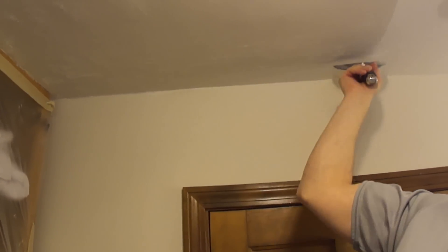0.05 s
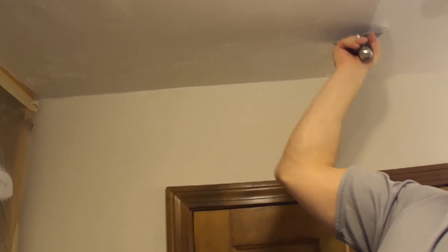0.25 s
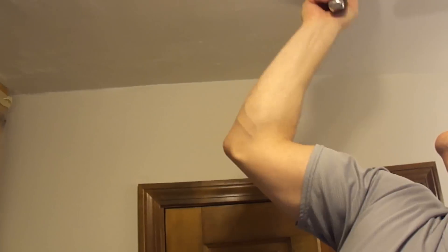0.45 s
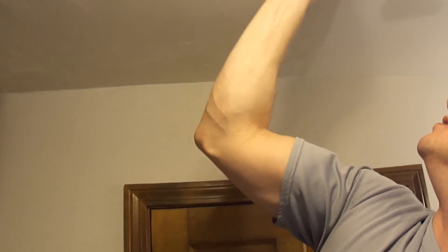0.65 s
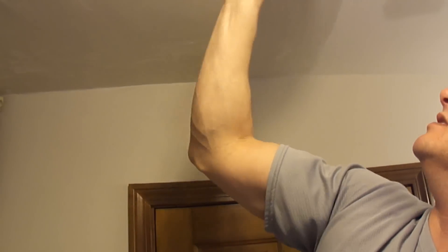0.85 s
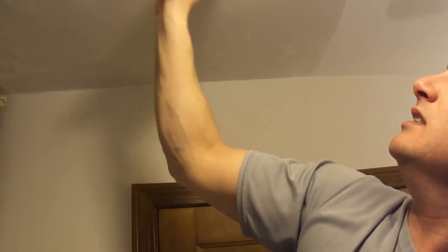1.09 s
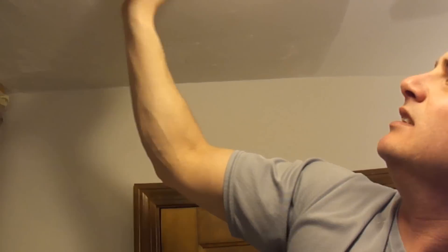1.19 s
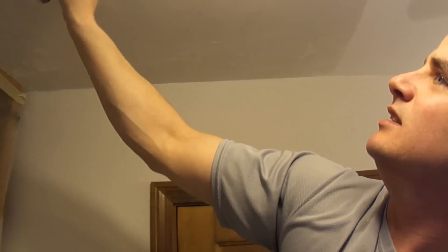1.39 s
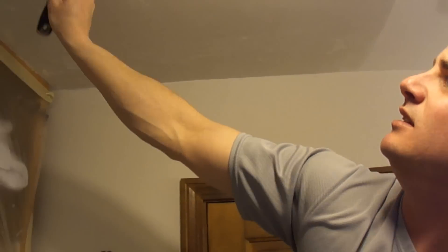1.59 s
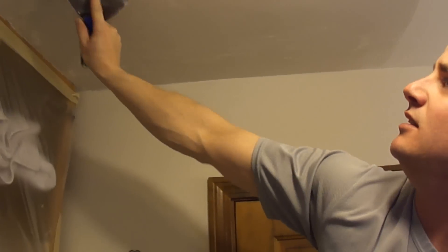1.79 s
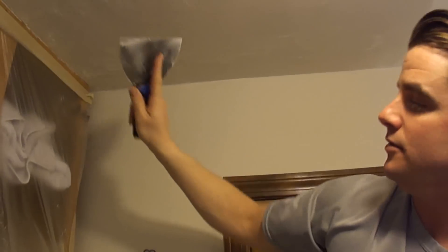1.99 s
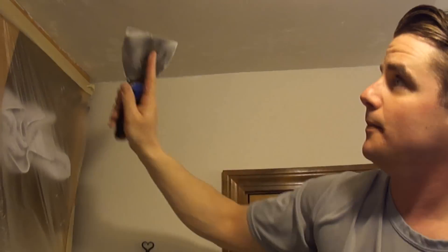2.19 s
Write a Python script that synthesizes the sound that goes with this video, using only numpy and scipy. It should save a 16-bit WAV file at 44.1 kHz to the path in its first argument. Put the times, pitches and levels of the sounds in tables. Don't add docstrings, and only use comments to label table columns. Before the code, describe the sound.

One long harsh scrape of a metal putty blade over dry ceiling plaster in a small room

```python
import sys
import numpy as np
from scipy import signal
from scipy.fft import rfft, irfft, next_fast_len
from scipy.io import wavfile

SR = 44100
rng = np.random.default_rng(int(sys.argv[2]) if len(sys.argv) > 2 else 0)


def wrap_up_sound(samples):
    columns = np.atleast_2d(samples).T
    tamed = np.clip(columns, -1, 1)
    steps = np.round(tamed * 32767).astype(np.int16)
    wavfile.write(sys.argv[1], SR, steps)


def voltage_ratio(decibels):
    exponent = np.asarray(decibels, float) / 20
    return 10 ** exponent


N = 99225

# time in [s], scrape level in [dB], brightness from edge speed in [dB per octave],
# blade flex pitch in [Hz].
STROKE_PATH = [(0.23, -18, -3, 990), (.272, -21, -1, 990), (0.321, -15.5, -0.5, 1360),
               (.358, -18.5, 2, 2070), (.544, -18.5, -1, 2250), (.668, -19, 0.5, 1780),
               (.696, -20, -1, 2390), (.724, -23.5, -0.5, 1850), (.9, -21, 0.5, 1480),
               (1.014, -22, 1.5, 1495), (1.328, -21, 2.5, 2700), (1.41, -19.5, 2, 2030),
               (1.55, -19.5, 1.5, 2700), (1.652, -22, 1, 2420), (1.741, -19.5, 1.5, 2730),
               (1.802, -25.5, -2, 1230), (1.867, -24.5, 1, 1360), (2.0, -53.5, -1, 900)]
# start in [s], level in [dB], length in [s].
LANDING_CHATTER = [
    (.128, -54, .034),
    (.2072, -31, .014),
    (.2218, -18, .008),
]
# time in [s], level in [dB], board share in [dB].
LANDING_KNOCKS = [
    (0.2083, -31.5, 2),
    (.2138, -31, 0),
    (.2219, -17.5, -6),
    (.2226, -16.5, -28),
    (.2236, -19, -9),
    (.2242, -20, -15),
    (.2257, -18, -9),
    (.2268, -19, -14),
    (.2293, -23, -10),
]
# time in [s], level in [dB], rise in [s], fall in [s],
# low thump in [dB].
HIGH_SPOTS = [(.235, -24.5, 0.0041, 0.046, 4), (.31, -46, 0.034, 0.011, -8), (.42, -56, 0.047, 0.056, 9),
              (0.589, -37.5, 0.0091, 0.04, 2), (0.949, -34, 0.022, 0.027, -3),
              (1.11, -42, 0.036, 0.012, -4), (1.29, -45, 0.017, 0.082, -16), (1.41, -45, 0.015, 0.016, -11),
              (1.66, -51, 0.0067, 0.023, -10), (1.774, -31.5, 0.017, 0.063, -15),
              (1.83, -48, 0.039, 0.12, 7.5), (1.923, -33.5, 0.026, 0.018, -8)]
# time in [s], peak in [dB].
GRIT_SNAPS = [(0.2985, -6), (0.3112, -20), (0.3646, -7), (0.446, -4), (0.5115, -2.5), (0.5246, -6),
              (0.6, -9), (0.645, -12), (0.682, -11), (0.7426, -4), (0.7761, -6), (0.7886, -12), (0.826, -3),
              (0.9415, -8), (0.9982, -16), (1.019, -14), (1.0374, -9), (1.0905, -17), (1.1596, -22),
              (1.2157, -12), (1.238, -11), (1.2957, -7), (1.3103, -6), (1.3376, -11), (1.4189, -10),
              (1.4491, -14), (1.4674, -6), (1.5067, -10), (1.5375, -15), (1.585, -21), (1.6253, -10),
              (1.6926, -7), (1.8447, -18), (1.8562, -15)]
# frequency in [Hz], level in [dB].
SCRAPE_COLOUR = [(320, -38.5), (600, -15.5), (1010, -0.5), (1740, -1.5), (2500, -2.5), (4500, -12),
                 (6500, -17), (10900, -35.5)]
# frequency in [Hz], width in [Hz], level over the scrape in [dB].
BLADE_MODES = [(717, 45, 5), (960, 60, 3), (1227, 60, 3.5), (1410, 60, 3), (1494, 60, 3.5), (1782, 60, 3.5),
               (2100, 90, 3.5), (2400, 80, 3), (2600, 80, 4), (2826, 60, 4.5), (3080, 120, 4),
               (3480, 180, 4.5), (4300, 300, 4), (7050, 201, 2)]
# frequency in [Hz], width in [Hz], level in [dB].
BOARD_MODES = [(71, 140, -42), (158.4, 19.5, -13.5), (237, 62, -12), (409, 92, -9.5), (498.3, 32.3, 3.5),
               (690, 426, -8.5)]
# centre in [s], rms level in [dB], pitch in [Hz],
# half length in [s].
EDGE_CATCHES = [(0.313, -44, 6406, 0.018), (0.313, -36, 4349, 0.018), (0.313, -25, 1313, 0.018),
                (0.316, -26, 947, 0.018), (0.319, -27, 2056, 0.018), (0.325, -29, 2347, 0.018),
                (0.351, -32, 3563, 0.018), (0.389, -36, 4349, 0.018), (0.459, -31, 3337, 0.018),
                (0.522, -27, 2185, 0.018), (0.531, -28, 2573, 0.018), (0.58, -27, 1227, 0.018),
                (0.688, -30, 1776, 0.018), (0.697, -27, 2411, 0.018), (0.833, -31, 1787, 0.018),
                (0.856, -31, 1561, 0.018), (0.955, -44, 5964, 0.018), (0.955, -34, 484, 0.018),
                (1.004, -31, 1399, 0.018), (1.112, -39, 495, 0.018), (1.112, -31, 1475, 0.018),
                (1.173, -29, 1475, 0.018), (1.193, -34, 1055, 0.018), (1.268, -31, 1754, 0.018),
                (1.297, -32, 3509, 0.018), (1.318, -26, 2400, 0.018), (1.329, -28, 1496, 0.018),
                (1.39, -32, 1044, 0.018), (1.437, -41, 6180, 0.018), (1.541, -28, 2820, 0.018),
                (1.547, -28, 2357, 0.018), (1.611, -30, 1378, 0.018), (1.617, -33, 990, 0.018),
                (1.646, -30, 2411, 0.018), (1.681, -30, 1399, 0.018), (1.71, -30, 2691, 0.018),
                (1.724, -39, 4425, 0.018), (1.727, -43, 5458, 0.018), (1.73, -46, 6363, 0.018),
                (1.73, -44, 5652, 0.018), (1.733, -30, 2508, 0.018), (1.741, -33, 3219, 0.018),
                (1.765, -31, 1205, 0.018), (1.779, -35, 495, 0.018), (1.837, -31, 1388, 0.018),
                (1.927, -38, 506, 0.018)]
# centre in [s], rms level in [dB], pitch in [Hz],
# half length in [s].
NEXT_LANDING_RINGS = [
    (2.2483, -32, 1600, .002),
    (2.2493, -32, 2950, .002),
    (2.249, -35, 4450, .0025),
]
# start in [s], level in [dB], pitch in [Hz], ring T60 in [s].
CRUMB_TICKS = [(0.039, -48, 1410, 0.066), (.0505, -41, 5300, .004), (.0505, -46, 4000, .004),
               (.055, -45, 1390, .04), (.061, -43, 617, 0.038), (0.071, -42, 1430, .03),
               (0.084, -43, 444, 0.024), (.117, -42, 5500, .004), (.1275, -46, 6400, .005),
               (.132, -40, 2960, 0.022), (.133, -46, 895, .02), (0.146, -38.5, 402, .05),
               (.184, -37, 5400, .004), (.184, -44, 4200, .004), (2.002, -43, 3180, 0.011),
               (2.148, -37.5, 690, 0.056), (2.163, -34, 740, 0.019), (2.193, -43, 690, 0.028),
               (2.219, -33, 5130, .003)]
# frequency in [Hz], level in [dB].
FLOOR_COLOUR = [(25, -30), (100, -11), (250, -0.5), (500, 0), (1300, -1), (3000, -7.5), (6000, -13.5),
                (11000, -27)]

GRIT_PER_S, BITES_PER_S, GRIT_SPREAD_DB, HISS_SHARE = 6000, 2500, 0.5, 0.5
FLUTTER_DB, PATCHY_DB, TOUCH_TILT_DB = 0.45, 1.5, 1.5
BOARD_SHARE_DB, BITE_LOW_CUT_HZ = -28, 340
NEXT_S, NEXT_DB, NEXT_RISE_S = 2.2435, -30, 0.004
SNAP_DB, SNAP_BOARD_DB, KNOCK_SOFT_HZ = -19, -20, 4200
FLEX_DB, FLEX_OCTAVES = 6.5, 0.19
WANDER_DB, WANDERS_PER_S = 2.5, 9
CATCH_WOBBLE_RAD, CATCH_FLUTTER_DB, WOBBLES_PER_S = 1.1, 4, 70
ROOM_T60_S, WALL_CUT_HZ, ROOM_DB, FLOOR_DB = 0.21, 6900, -10, -51
HALF_RATE_HZ, CUTOFF_HZ = 11025, 15720
IMAGE_DB, IMAGE_RISE_HZ, LEAK_DB, OVERLOAD_TOP = -8, 11700, -40, 0.72


def knife():
    t = np.arange(N) / SR
    s, level_db, tilt_db, flex_hz = np.transpose(STROKE_PATH)
    touch = np.clip((t - s[0] + 0.0021) / 0.0034, 0, 1) * np.clip((s[-1] - t) / 0.03, 0, 1)
    edge = touch * voltage_ratio(np.interp(t, s, level_db) + FLUTTER_DB * drift(14))

    push = thump = edge * voltage_ratio(BOARD_SHARE_DB)
    for at_s, db, rise_s, fall_s, low_db in HIGH_SPOTS:
        shape = np.exp(-np.where(t < at_s, ((at_s - t) / rise_s) ** 2, (t - at_s) / fall_s))
        bite = touch * voltage_ratio(db) * shape
        push = push + bite
        thump = thump + voltage_ratio(low_db) * bite

    edge = edge + voltage_ratio(NEXT_DB) * np.clip((t - NEXT_S) / NEXT_RISE_S, 0, 1.5)
    for at_s, db, length_s in LANDING_CHATTER:
        age = (t - at_s) / length_s
        edge = edge + voltage_ratio(db) * (age > 0) * np.exp(-np.clip(age, 0, 3) ** 4)

    fine = rms_one(grit(GRIT_PER_S) + HISS_SHARE * rng.standard_normal(N))
    coarse = grit(BITES_PER_S)
    outside_stroke = (t < LANDING_CHATTER[-1][0]) | (t > s[-1])
    tilt_db = np.where(outside_stroke, TOUCH_TILT_DB, np.interp(t, s, tilt_db))
    on_blade = patchy(fine, tilt_db, PATCHY_DB) * edge
    high = signal.butter(4, BITE_LOW_CUT_HZ, "high", fs=SR, output="sos")
    low = signal.butter(4, BITE_LOW_CUT_HZ, "low", fs=SR, output="sos")
    on_board = signal.sosfilt(high, coarse * push) + signal.sosfilt(low, coarse * thump)

    blade_sound = blade(on_blade + knocks(board_share=0), np.interp(t, s, flex_hz))
    board_sound = board(on_board + knocks(board_share=1))
    return blade_sound / np.std(1.51 * colour(fine, SCRAPE_COLOUR)) + board_sound / np.std(board(coarse))


def grit(per_s):
    sizes = voltage_ratio(GRIT_SPREAD_DB * np.minimum(rng.exponential(1, N), 5)) * rng.choice([-1, 1], N)
    return rms_one(sizes * (rng.random(N) < per_s / SR))


def knocks(board_share):
    snaps = [(s, db + SNAP_DB, SNAP_BOARD_DB) for s, db in GRIT_SNAPS]
    s, db, board_db = np.array([*LANDING_KNOCKS, *snaps]).T
    clicks = np.zeros(N)
    clicks[(s * SR).astype(int)] = 20 * voltage_ratio(db + board_share * board_db) * (-1) ** np.arange(len(s))
    return signal.sosfilt(signal.butter(2, KNOCK_SOFT_HZ, fs=SR, output="sos"), clicks)


def blade(force, flex_hz):
    rings = 0
    for hz, width_hz, db in BLADE_MODES:
        near_db = FLEX_DB * np.exp(-(np.log2(hz / flex_hz) / FLEX_OCTAVES) ** 2)
        gain = (voltage_ratio(db) - 1) * voltage_ratio(near_db + WANDER_DB * drift(WANDERS_PER_S))
        rings = rings + gain * resonance(force, hz, width_hz)
    return colour(force + rings, SCRAPE_COLOUR)


def board(force):
    out = 0
    for k, (hz, width_hz, db) in enumerate(BOARD_MODES):
        out = out + (-1) ** k * voltage_ratio(db) * resonance(force, hz, width_hz)
    return out


def catches():
    out, t = np.zeros(N), np.arange(N) / SR
    wobble_rad = CATCH_WOBBLE_RAD * drift(WOBBLES_PER_S)
    flutter_db = CATCH_FLUTTER_DB * drift(WOBBLES_PER_S)
    for k, (s, db, hz, half_s) in enumerate([*EDGE_CATCHES, *NEXT_LANDING_RINGS]):
        lag = 3001 * k
        swell = voltage_ratio(db + 3.5 + np.roll(flutter_db, lag)) * np.exp(-((t - s) / half_s) ** 2)
        out += swell * np.sin(2 * np.pi * hz * t + np.sqrt(hz / 1500) * np.roll(wobble_rad, lag))
    return out


def crumbs():
    out, t = np.zeros(N), np.arange(N) / SR
    for s, db, hz, t60_s in CRUMB_TICKS:
        age = np.maximum(t - s, 0)
        onset = 1 - np.exp(-age * hz / 0.93)
        out += voltage_ratio(db - 60 * age / t60_s) * np.sin(2 * np.pi * hz * age) * onset
    return out


def room(x):
    out, dull = np.zeros(N), np.exp(-2 * np.pi * WALL_CUT_HZ / SR)
    lags = (rng.uniform(0.015, 0.043, size=10) * SR).astype(int)
    for k, lag in enumerate(lags):
        loop, state = x.copy(), [0.]
        gain = voltage_ratio(-60 * lag / SR / ROOM_T60_S)
        for i in range(lag, N, lag):
            back, state = signal.lfilter([gain * (1 - dull)], [1, -dull], loop[i - lag:i], zi=state)
            loop[i:i + lag] += back[:N - i]
        out += (loop - x) * (-1) ** k
    return out


def quiet_floor():
    return voltage_ratio(FLOOR_DB) * rms_one(colour(patchy(rng.standard_normal(N), 0, 3.4), FLOOR_COLOUR))


def patchy(x, tilt_db, patchy_db):
    whole, octave, out = rfft(x), np.log2(np.fft.rfftfreq(N, 1 / SR) + 1), 0
    for centre in np.arange(4, 15, 0.5):
        part = irfft(whole * np.cos(np.pi * np.clip(octave - centre, -0.5, 0.5)) ** 2, N)
        flicker_db = patchy_db * np.clip((14.5 - centre) / 3, 0, 1) * drift(11.6)
        out = out + part * voltage_ratio(tilt_db * (centre - 11) + flicker_db)
    return out


def drift(rate_hz):
    r = np.exp(-80 * np.pi * rate_hz / SR)
    slow = signal.lfilter([1], [1, -2 * r, r * r], rng.standard_normal(N // 40 + 2002))[2000:]
    return np.interp(np.arange(N) / 40, np.arange(len(slow)), rms_one(slow))


def resonance(x, hz, width_hz):
    r = np.exp(-np.pi * width_hz / SR)
    poles = [1, -2 * r * np.cos(2 * np.pi * hz / SR), r * r]
    return signal.lfilter(np.array([1, 0, -1]) * (1 - r * r) / 2, poles, x + 1e-18)


def colour(x, spectrum):
    hzs, dbs = np.transpose(spectrum)
    size = next_fast_len(2 * N)
    gain_db = np.interp(np.log(np.fft.rfftfreq(size, 1 / SR) + 1), np.log(hzs), dbs)
    cepstrum = irfft(np.log(voltage_ratio(gain_db)), size)
    cepstrum[1:size // 2] *= 2
    cepstrum[size // 2 + 1:] = 0
    return irfft(rfft(x, size) * np.exp(rfft(cepstrum)), size)[:N]


def rms_one(x):
    return x / np.sqrt(np.mean(x ** 2) + 1e-20)


def scene():
    close = knife() + crumbs() + catches()
    return (close + voltage_ratio(ROOM_DB) * room(close) + quiet_floor())[None]


def roll_off(x):
    return signal.sosfilt(signal.butter(12, 16840, fs=SR, output="sos"), x)


def record(dry):
    band = signal.sosfilt(signal.ellip(12, 0.3, 45, HALF_RATE_HZ, fs=SR, output="sos"), dry)
    mirror = band * (-1) ** np.arange(N)
    image = signal.sosfilt(signal.butter(2, IMAGE_RISE_HZ, "high", fs=SR, output="sos"), mirror)
    cut_filter = signal.ellip(14, 0.3, 95, CUTOFF_HZ, fs=SR, output="sos")
    cut = signal.sosfilt(cut_filter, band + voltage_ratio(IMAGE_DB) * image)
    cut = np.clip(cut, -OVERLOAD_TOP, OVERLOAD_TOP)
    leak = signal.sosfilt(signal.ellip(10, 0.5, 95, CUTOFF_HZ + 750, fs=SR, output="sos"), image)
    return roll_off(cut + voltage_ratio(IMAGE_DB + LEAK_DB) * leak)


dry = scene()
out = record(dry)
wrap_up_sound(out)
```